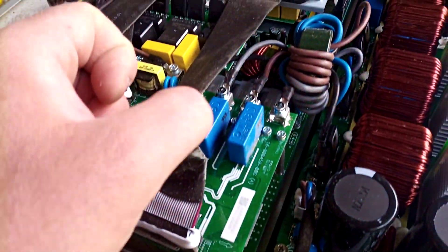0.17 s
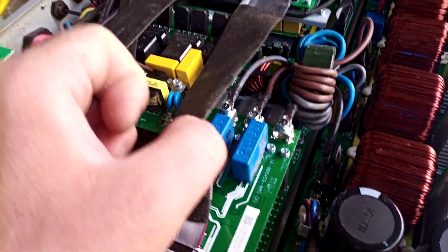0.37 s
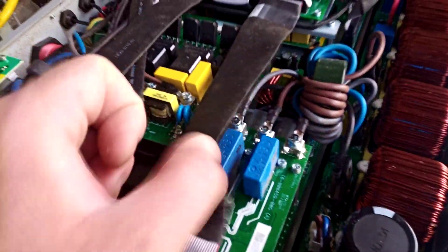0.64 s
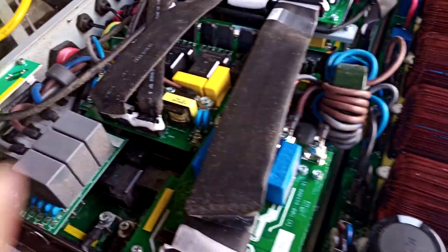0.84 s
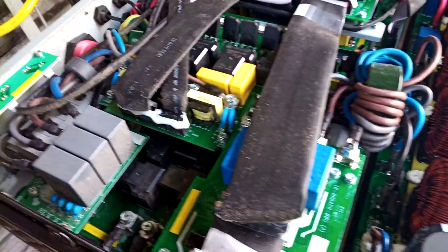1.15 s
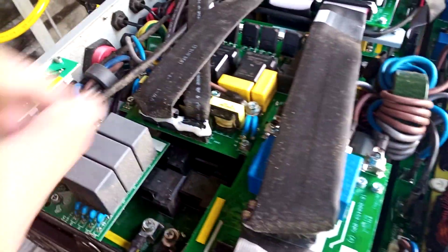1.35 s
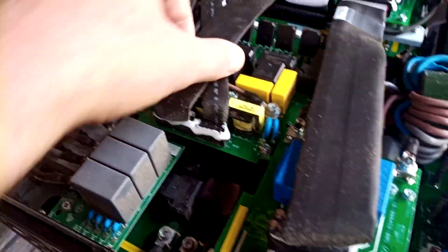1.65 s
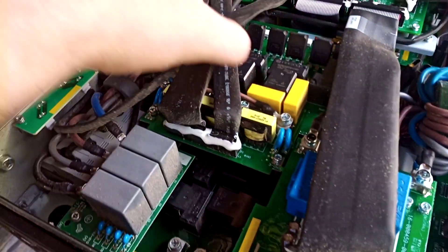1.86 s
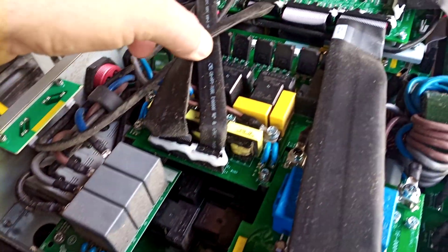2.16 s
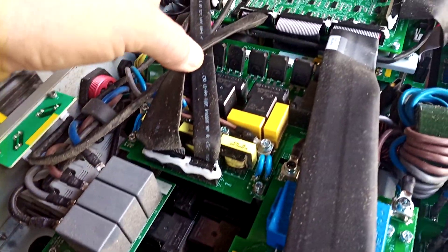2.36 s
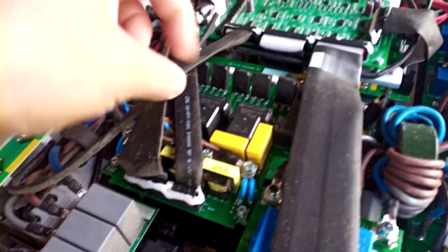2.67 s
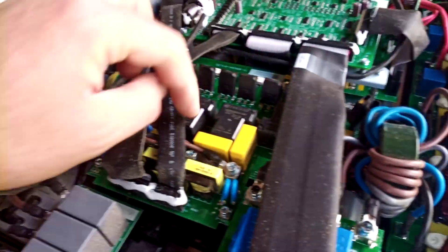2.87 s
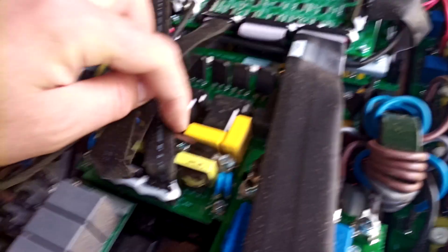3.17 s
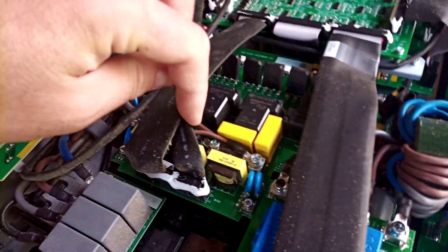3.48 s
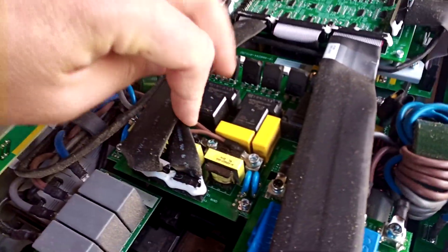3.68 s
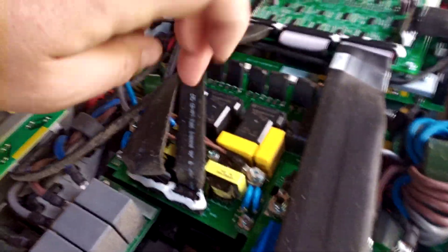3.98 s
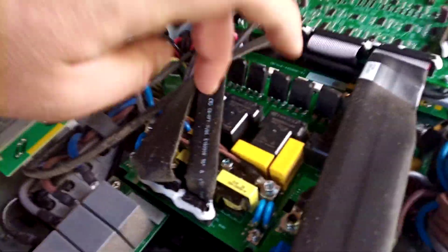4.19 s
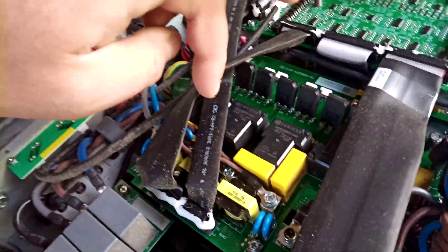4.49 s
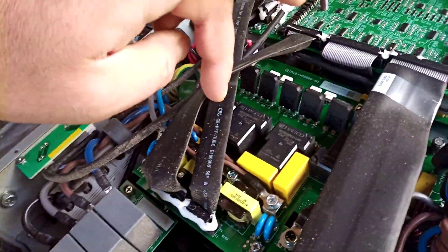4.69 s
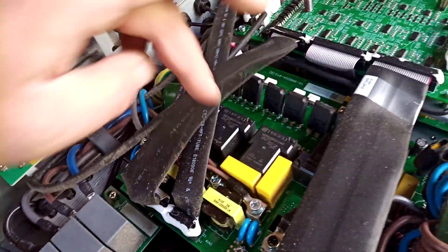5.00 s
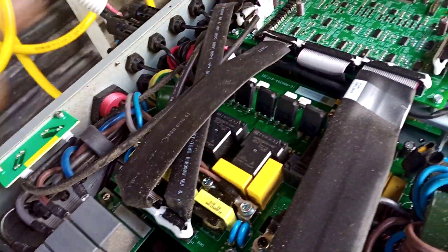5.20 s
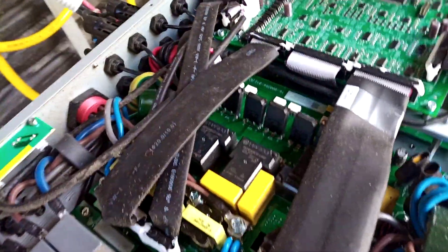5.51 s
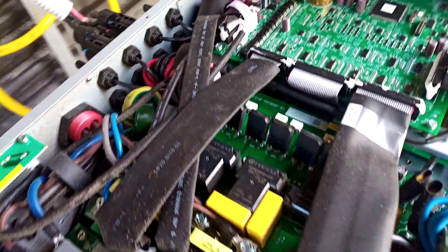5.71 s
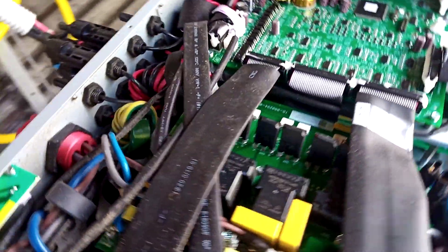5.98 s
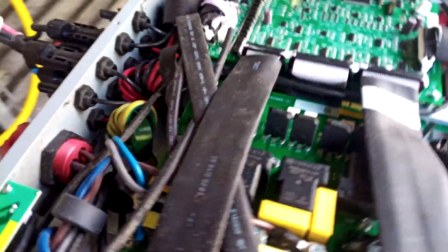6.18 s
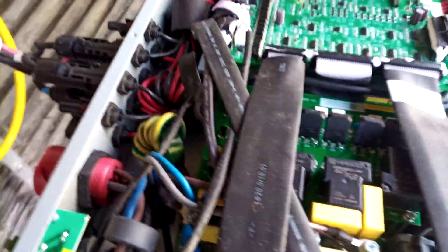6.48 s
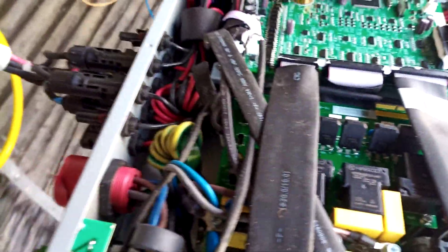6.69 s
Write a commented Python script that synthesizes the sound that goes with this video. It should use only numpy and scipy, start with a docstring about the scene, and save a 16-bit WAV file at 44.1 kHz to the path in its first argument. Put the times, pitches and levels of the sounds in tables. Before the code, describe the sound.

Close up in a small quiet room, a hand moves stiff sleeved cables inside an open electrical unit. A crisp tick comes early, then light brushing and scraping. Small ticks gather midway, followed by two sharp plasticky snaps that briefly ring the boards and metal case. Dull low bumps on the hand-held phone end the action over steady hiss and a faint electronic whine.

```python
"""Sleeved flat cables, lifted and bent by a hand inside an opened inverter in a small room, close to a hand-held phone.
The sleeves tick and twice snap: bursts of noise shaped by the sleeve, each ringing the boards and metal case.
Around them lie gritty scrapes and the uneven hiss of sliding, made from noise with flickering strength.
Damped low swings bump the phone and noise rumbles through its grip; thin whistles fall in pitch.
Under it all lie steady room hiss and a faint electronic whine of wavering sines."""
import sys
import numpy as np
from scipy import signal
from scipy.fft import rfft, irfft
from scipy.io import wavfile
from scipy.ndimage import uniform_filter1d

SR = 44100
rng = np.random.default_rng(int(sys.argv[2]) if len(sys.argv) > 2 else 0)


def generate_wav(sig):
    """Save sig (samples, or channels by samples) to the path in sys.argv[1] as 16-bit PCM at SR."""
    pcm = np.round(np.clip(np.atleast_2d(sig).T, -1, 1) * 32767).astype(np.int16)
    wavfile.write(sys.argv[1], SR, pcm)


N = 302085  # length [samples]


def undb(db):
    """Decibels to gain."""
    return 10 ** (np.asarray(db) / 20)


def unit(x):
    """Scale to rms 1."""
    return x / np.sqrt(np.mean(x ** 2))


def times(seconds):
    """Time axis of a short sound [s]."""
    return np.arange(int(seconds * SR)) / SR


def add(out, s, sound):
    """Mix a sound in at time s."""
    i = max(int(s * SR), 0)
    out[i:i + len(sound)] += sound[:max(N - i, 0)]


def colour(x, points):
    """Causal minimum-phase filter through (frequency [Hz], gain [dB]) points, built from the cepstrum."""
    size = 2048
    hz, db = np.transpose(points)
    log_hz = np.log(np.fft.rfftfreq(size, 1 / SR) + 1)
    log_gain = np.log(undb(np.interp(log_hz, np.log(hz), db)))
    # keeping only the positive-time half of the cepstrum makes the filter causal
    cepstrum = irfft(log_gain)[:size // 2]
    cepstrum[0] /= 2
    impulse = irfft(np.exp(rfft(2 * cepstrum, size)))
    return signal.fftconvolve(x, impulse)[:len(x)]


def walk(rate):
    """Smooth random wander of rms 1, heading for a new value rate times a second."""
    k = max(int(SR / rate), 1)
    steps = np.repeat(rng.standard_normal(N // k + 1), k)
    return unit(uniform_filter1d(steps, k)[:N])


def friction(spectrum, grain_db, grain_rate):
    """Dense tiny slips whose strength flickers as the surfaces catch."""
    slips = rng.standard_normal(N) * undb(grain_db * walk(grain_rate))
    return unit(colour(slips, spectrum))


def moves(rows, attack_s, release_s, rest_db):
    """Gain of hand movements (time, length, level): each gets going, holds and dies away over a resting level."""
    t, power = np.arange(N) / SR, undb(rest_db) ** 2
    for s, length, db in rows:
        start = np.clip((t - s) / attack_s, 0, 1)
        end = np.exp(-np.clip((t - s - length) / release_s, 0, 20))
        power = power + (undb(db) * start * end) ** 2
    return np.sqrt(power)


def clicks(pitch_db=7, pitch_span=1.36, ring_db=-13.5, ring_rise_s=0.0047, creep_db=-24, creep_s=0.0026):
    """Each tick is a rush of slips that builds and dies in the sleeve and sets the case ringing."""
    # sleeve ticks and snaps: (time [s], level [dB], rise [s], decay [s], sleeve pitch [Hz],
    # body at 1900 Hz [dB], case ring [dB re level + ring_db], ringing most near [Hz])
    sleeve_ticks = [(0.684, -26.5, 0.003, 0.0011, 4330, -21, -15, 6260),
                    (.689, -42, 0.0023, 0.0029, 3430, 0.5, -12, 590),
                    (0.824, -55, .001, 0.0042, 6050, -15, -10, 6300),
                    (.869, -44.5, .001, 0.0035, 2240, 6, 1, 1500),
                    (1.609, -58, 0.0026, 0.007, 2800, -4, -8, 3000),
                    (2.3011, -44.5, 0.00067, 0.0012, 3520, 0, -1.5, 850),
                    (2.3441, -43, 0.00081, 0.0031, 2200, 7.5, -2, 800),
                    (2.819, -53, .004, 0.013, 5300, -18, 4, 5970),
                    (3.209, -36, 0.0055, 0.0017, 3150, -19, -16, 3500),
                    (3.219, -43, .0038, 0.0045, 2870, -14, -15, 3500),
                    (3.283, -49, .0006, .0015, 3500, -18, -16, 6300),
                    (3.3177, -44.5, .0012, .0011, 6000, -18, -7, 6300),
                    (3.335, -40, 0.00054, 0.0021, 3600, -25, -22, 3500),
                    (3.34, -42, 0.00071, .003, 4600, -31, -4.5, 3500),
                    (3.425, -57.5, 0.0014, 0.013, 4740, -13, 2, 6260),
                    (3.6545, -40, 0.00076, 0.00075, 5800, -14, -22, 6300),
                    (3.91, -40, .031, .0028, 5700, -14, -0.5, 900),
                    (3.9319, -28.5, .0036, 0.0032, 6200, -35, -14, 930),
                    (3.978, -46, 0.0022, 0.0034, 3900, -12, -8, 900),
                    (4.021, -49, 0.00047, 0.0017, 6260, -16, 3.5, 900),
                    (4.384, -18.5, .0027, 0.0069, 4200, -1, -3, 1524),
                    (4.846, -44.5, .0011, 0.005, 5450, -4, -2.5, 6230),
                    (5.024, -42.5, 0.0064, .0084, 2670, -10, -22, 2000),
                    (5.040, -47, 0.0014, 0.0027, 6300, -10, -10, 386),
                    (5.2655, -21.5, .0013, 0.0061, 7140, -3, -9, 6600),
                    (5.270, -20.5, 0.00097, 0.003, 3240, -13, -7, 920)]
    # spectrum of the sleeve: (frequency [Hz], gain [dB])
    sleeve_spectrum = [(100, -34), (550, -28.5), (900, -21.5), (1400, -10), (2300, -5), (3200, -1.5),
                       (4100, -0.5), (5000, -3.5), (6500, 3), (7400, -6.5), (8300, -20.5), (9300, -31.5),
                       (13000, -33), (16000, -49)]
    # a sudden slip is bright, a gradual one dull: treble gain [dB] and the rise time between them [s]
    sudden_db, gradual_db, sudden_s = 8, -12.5, 0.0046
    out, lead = np.zeros(N), 1 / 100
    t = times(.3) - lead
    for s, db, rise, decay, hz, body_db, case_db, near_hz in sleeve_ticks:
        bright_db = gradual_db + (sudden_db - gradual_db) * np.exp(-(rise / sudden_s) ** 2)
        contact = [(1900, body_db), (3000, 0.004), (5200, 0), (6200, bright_db)]
        # the unheld part of the sleeve resonates
        free_length = [(hz / pitch_span, 0), (hz, pitch_db), (hz * pitch_span, 0)]
        force = np.clip(t / rise, 0, 1) * np.exp(-np.maximum(t - rise, 0) / decay)
        # the sleeve creeps just before it lets go
        force = force + undb(creep_db) * np.exp(-np.abs(t) / creep_s)
        tick = colour(force * rng.standard_normal(len(t)), sleeve_spectrum)
        tick = colour(colour(tick, contact), free_length)
        add(out, s - lead, undb(db) * unit(tick) * np.sqrt(np.mean(force ** 2)))
        ring = case_ring(near_hz) * np.minimum((t + lead) / ring_rise_s, 1)
        add(out, s + rise / 2, undb(db + case_db + ring_db) * ring)
    return out


def case_ring(near_hz, far_db=-9, reach=0.2, twin_db=-5, detune=.03):
    """The ring of boards and case; the place of the blow favours the modes near one frequency."""
    # modes of case and boards: (frequency [Hz], relative level [dB], t60 [s])
    case_modes = [(335, -18, 0.16), (784, -7, 0.083), (876, -11.5, 0.11), (980, -8.5, 0.12),
                  (1479, 0, 0.045), (1727, -7.5, 0.086), (1972, -3.5, 0.15), (2400, -7, .1),
                  (3180, -14, 0.21), (3400, -3, 0.13), (3470, -4, 0.19), (3662, 12, 0.051),
                  (3870, -22, 0.105), (4170, 2, 0.042), (4070, -16, 0.037), (4440, -1, 0.12),
                  (4650, 6.5, 0.063), (5730, 13, 0.056), (6200, 4, 0.073), (6350, -2, .2), (6600, -9, 0.2),
                  (6720, -3, 0.24), (6500, 3, 0.097), (7070, 3.5, 0.09)]
    t, ring = times(.3), 0
    for hz, db, t60 in case_modes:
        place_db = far_db * (1 - np.exp(-(np.log(hz / near_hz) / reach) ** 2))
        # a weaker, randomly detuned partner beside each mode makes the ring denser and less pure
        twin_hz = hz * (1 + detune * rng.standard_normal())
        mode = np.sin(2 * np.pi * (hz * t + rng.random()))
        twin = np.sin(2 * np.pi * (twin_hz * t + rng.random()))
        ring = ring + undb(db + place_db - 60 * t / t60) * (mode + undb(twin_db) * twin)
    return ring


def scrapes(width_hz=850, rasp_db=-3.0, band_db=-5, sag=.05):
    """Gritty strokes of sleeve on sleeve; a resonance glides as the contact moves along the sleeve."""
    # sleeves dragged over each other: (time [s], length [s], level [dB], starting pitch [Hz])
    strokes = [(0, 0.15, -71, 6150), (0.849, 0.098, -64, 1610), (0.876, 0.068, -60, 2820),
               (0.931, 0.18, -73, 6100), (1.598, 0.036, -64, 2850), (1.67, .09, -70, 3310),
               (1.762, .07, -60, 5800), (1.815, .115, -59, 3140), (1.973, .055, -61.5, 5530),
               (3.217, 0.059, -53, 2830), (3.273, 0.065, -59.5, 3590), (3.71, 0.097, -59, 3970),
               (4.949, 0.14, -58.5, 5900), (5.337, 0.57, -69.5, 2130), (5.44, 0.21, -78, 4900),
               (5.721, .063, -64.5, 3850), (5.85, 1.0, -71, 2080), (5.897, 0.042, -53.5, 3380),
               (6.23, 0.06, -65, 4020), (6.416, 0.04, -54, 3710), (6.482, 0.033, -56.5, 3770)]
    # spectrum of the scraping rasp: (frequency [Hz], gain [dB])
    rasp_spectrum = [(500, -2), (1600, -18), (2100, -4), (3600, 2), (4600, 1.5), (6500, -3), (9000, -45)]
    out = np.zeros(N)
    grit = friction(rasp_spectrum, grain_db=3.0, grain_rate=430)
    # a complex wander turns the gliding tone into a narrow band of noise
    flutter = (walk(width_hz) + 1j * walk(width_hz)) * undb(2.7 * walk(120))
    for s, length, db, hz in strokes:
        u = times(length) / length
        part = int(rng.random() * (N - len(u))) + np.arange(len(u))
        # sag: share of its pitch that a stroke loses as the free length of sleeve grows
        phase = 2 * np.pi * np.cumsum(hz * (1 - sag * u)) / SR
        band = np.real(flutter[part] * np.exp(1j * phase))
        stroke = undb(band_db) * band + undb(rasp_db) * grit[part]
        add(out, s, undb(db) * np.sin(np.pi * u) * stroke)
    return shifting(out, echo_db=4.0)


def rubbing(case_db=-11, attack_s=0.024, release_s=0.038):
    """Skin and sleeves slide with an uneven hiss that rings the case; its hollow answers lower down."""
    # the hand slides along a cable: (time [s], length [s], hiss level [dB], hollow rub level [dB])
    slides = [(0, 0.13, -63.5, -71.5), (0.118, 0.41, -70, -73), (0.679, 0.028, -64, -59),
              (0.78, 0.088, -62, -69.5), (0.863, .2, -60, -71), (1.06, .3, -67.5, -78),
              (1.575, 0.4, -71, -81), (3.186, 0.11, -62, -63), (3.64, 0.286, -62.5, -73),
              (3.92, 0.071, -57, -55), (4.053, 0.19, -72.5, -80), (5.015, 0.042, -66, -65.5),
              (5.293, 0.37, -66, -68.5), (5.678, 0.093, -60, -76), (5.796, .26, -66.5, -78),
              (6.215, 0.29, -62, -71), (6.52, .33, -71.5, -88)]
    # spectrum of the sliding hiss: (frequency [Hz], gain [dB])
    hiss_spectrum = [(1200, -21.5), (2100, -6.5), (2700, -20.5), (4200, -6), (5200, -1.5), (6300, 5.5),
                     (7400, -3.5), (8200, -17.5), (10000, -25), (14000, -37.5)]
    # spectrum of the case's hollow: (frequency [Hz], gain [dB])
    hollow_spectrum = [(40, -16.5), (100, -0.5), (300, 4.5), (550, 0), (850, 3), (1400, -2), (2200, -13),
                       (5000, -30.5)]
    # between slides the hand still brushes the cables, hence the resting levels
    hiss_rows = [(s, length, db) for s, length, db, _ in slides]
    hiss_gain = moves(hiss_rows, attack_s, release_s, rest_db=-74.5)
    hollow_rows = [(s, length, db) for s, length, _, db in slides]
    hollow_gain = moves(hollow_rows, attack_s, release_s, rest_db=-75.5)
    slide = friction(hiss_spectrum, grain_db=0.4, grain_rate=180)
    ring = unit(signal.fftconvolve(slide, case_ring(4000))[:N])
    low = friction(hollow_spectrum, grain_db=2.54, grain_rate=94)
    return shifting(hiss_gain * (slide + undb(case_db) * ring) + hollow_gain * low, echo_db=1)


def shifting(x, echo_db, spread_s=0.002, hold_s=.07):
    """Close reflections between hand, boards and case; their comb crossfades to a new one every hold_s."""
    hop = int(hold_s * SR)
    t, fade = times(.02), np.hanning(2 * hop)
    padded = np.pad(x, (hop, 2 * hop))
    out = np.zeros(len(padded) + len(t))
    for i in range(0, N + hop, hop):
        echoes = rng.standard_normal(len(t)) * np.exp(-t / spread_s)
        echoes *= undb(echo_db) / np.linalg.norm(echoes)
        echoes[0] = 1  # direct sound
        piece = signal.fftconvolve(padded[i:i + 2 * hop] * fade, echoes / np.linalg.norm(echoes))
        out[i:i + len(piece)] += piece
    return out[hop:hop + N]


def bumps(fall=5.57, settle_s=0.0021, offset=0.15, scuff_db=-19, scuff_s=0.0028):
    """A finger pushes on the phone: a brief scuff, then a damped low swing whose pitch falls quickly and settles."""
    # soft bumps on the phone: (time [s], swell peak level [dB], settled pitch [Hz], time to swell peak [s])
    pushes = [(0.87, -40, 94.4, 0.011), (0.905, -48.5, 80, .0088), (.984, -48.5, 85, 0.011),
              (1.111, -47.5, 65, 0.0092), (1.26, -51.5, 85, .0088), (1.296, -52.5, 92, .0083),
              (1.933, -52, 78, 0.0093), (2.487, -53, 126, 0.014), (3.2635, -30.5, 112, 0.0042),
              (4.264, -50, 98, 0.012), (4.52, -51, 90, .011), (5.5, -50, 204, 0.0046),
              (5.875, -31, 101, 0.0062), (5.913, -30.5, 103, 0.0043), (6.405, -33.5, 110, 0.0046),
              (6.444, -25.5, 110, 0.0046), (6.463, -34.5, 121, 0.0042), (6.475, -29, 110, .0034),
              (6.485, -39.5, 128, 0.0051)]
    # spectrum of skin scuffing the phone: (frequency [Hz], gain [dB])
    scuff_spectrum = [(100, -26), (300, -4.5), (470, 10), (750, -2.5), (1100, -13), (2000, -17),
                      (5000, -45)]
    out, t = np.zeros(N), times(0.14)
    for s, db, hz, swell in pushes:
        phase = 2 * np.pi * np.cumsum(hz * (1 + fall * np.exp(-t / settle_s))) / SR
        envelope = (t / swell * np.exp(1 - t / swell)) ** 2
        swing = envelope * (np.sin(phase) - offset)
        scuff = unit(colour(rng.standard_normal(len(t)), scuff_spectrum))
        scuff = scuff * t / scuff_s * np.exp(1 - t / scuff_s)
        add(out, s, undb(db) * (swing + undb(scuff_db) * scuff))
    return out


def grip():
    """The holding hand rumbles through the phone's body, faintly at rest and more whenever it shifts."""
    # the grip shifts on the phone: (time [s], length [s], rumble level [dB])
    shifts = [(.12, 0.18, -66), (.83, 0.5, -63), (1.85, .13, -67), (2.21, .3, -59), (3.17, 0.13, -65.5),
              (4.13, 0.26, -64.5), (5.05, 0.054, -63.5), (5.46, 0.063, -59.5)]
    # spectrum of the grip's rumble: (frequency [Hz], gain [dB])
    rumble_spectrum = [(20, -20), (40, -1.5), (70, 8), (130, 2), (190, -6), (280, -20.5), (1000, -42)]
    gain = moves(shifts, attack_s=0.03, release_s=0.026, rest_db=-75.5)
    return gain * friction(rumble_spectrum, grain_db=3.0, grain_rate=27)


def whistles(waver=0.016, settle=3.2, flicker_db=4):
    """Thin, ragged high whistles: wavering sines that drop quickly in pitch and then level off."""
    # faint falling whistles: (time [s], length [s], start pitch [Hz], end pitch [Hz], level [dB])
    falls = [(0.14, 0.23, 7700, 7540, -64.5), (0.358, 0.14, 7900, 7480, -64.5),
             (1.115, 0.14, 8000, 7250, -62.5), (1.282, 0.14, 7800, 7400, -62.5),
             (3.544, 0.071, 10400, 9400, -68), (3.68, 0.19, 8600, 8000, -77),
             (6.592, 0.42, 9700, 8100, -80)]
    out, flicker = np.zeros(N), unit(undb(flicker_db * walk(70)))
    for s, length, start_hz, end_hz, db in falls:
        u = times(length) / length
        glide = end_hz + (start_hz - end_hz) * (1 - u) ** settle
        hz = glide * (1 + waver * walk(400)[:len(u)])
        add(out, s, undb(db) * np.sin(np.pi * u) * np.sin(2 * np.pi * np.cumsum(hz) / SR))
    return out * flicker


def room(x, build_s=0.0012):
    """Diffuse reflections of the small room, octave by octave, each dying away at its own rate."""
    # the room's answer: (octave centre [Hz], level [dB], t60 [s])
    room_octaves = [(296, 7.5, 0.17), (880, 4, 0.19), (1703, -2.5, 0.074), (3090, -10.5, 0.16),
                    (6600, -14.5, 0.2), (12000, -14, 0.092)]
    t, tail = times(.5), 0
    for hz, db, t60 in room_octaves:
        edges = [hz / np.sqrt(2), min(hz * np.sqrt(2), SR / 2 - 1)]
        echoes = rng.standard_normal(len(t)) * undb(-60 * t / t60) * (1 - np.exp(-t / build_s))
        band = signal.butter(2, edges, "band", fs=SR, output="sos")
        tail = tail + undb(db) * signal.sosfilt(band, echoes / np.linalg.norm(echoes))
    return signal.fftconvolve(x, tail)[:N]


def background(air_db=-68.5, drift=0.0001):
    """Steady room hiss of filtered noise and the thin whine of electronics, sines drifting slightly in pitch."""
    # spectrum of the room's steady air: (frequency [Hz], gain [dB])
    air_spectrum = [(18, -42.5), (30, -5.5), (70, -5.5), (145, 1), (355, -6.5), (889, -11), (2610, -17),
                    (5170, -15), (6210, -10), (7270, -29), (8080, -32.5), (8740, -23), (12000, -28),
                    (14800, -19.5), (16000, -12.5)]
    # electronic whine: (frequency [Hz], rms level [dB])
    whine_tones = [(6336, -80), (7068, -81.5), (8468, -87.5), (9141, -97.5), (15536, -92)]
    out = undb(air_db) * unit(colour(rng.standard_normal(N), air_spectrum))
    for hz, db in whine_tones:
        phase = 2 * np.pi * np.cumsum(hz * (1 + drift * walk(40))) / SR
        out = out + undb(db) * unit(np.sin(phase))
    return out


def scene():
    """Cables, case and room, heard from just above the open unit."""
    contacts = clicks() + scrapes()
    handling = rubbing() + bumps() + grip()
    return (contacts + room(contacts) + handling + whistles() + background())[None]


def record(dry, bass_hz=40, top_hz=15800):
    """The phone's microphone thins the deep bass and cuts the top."""
    thin = signal.sosfilt(signal.butter(N=4, Wn=bass_hz, btype="high", fs=SR, output="sos"), dry)
    return signal.sosfilt(signal.ellip(8, .2, 70, top_hz, fs=SR, output="sos"), thin)


dry = scene()
out = record(dry)
generate_wav(out)
```